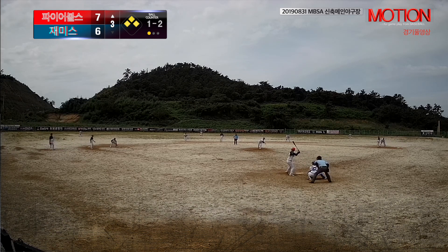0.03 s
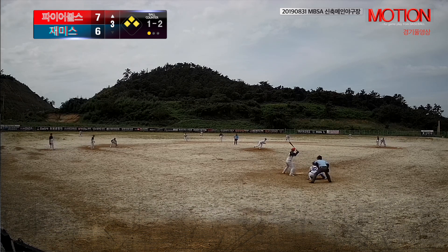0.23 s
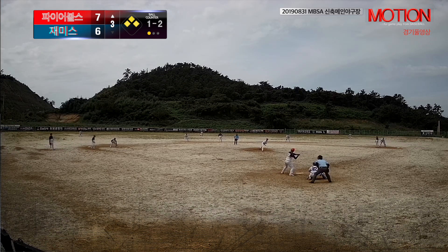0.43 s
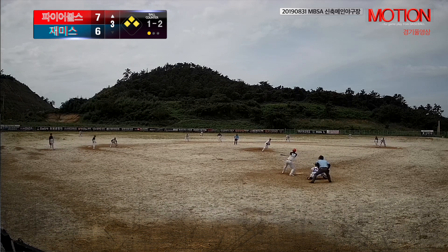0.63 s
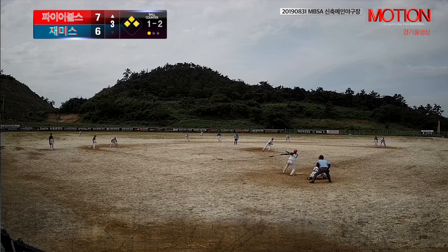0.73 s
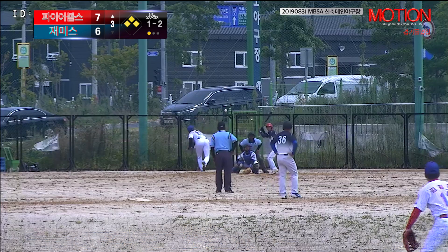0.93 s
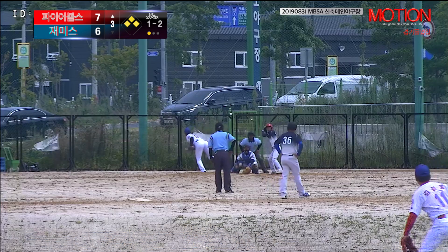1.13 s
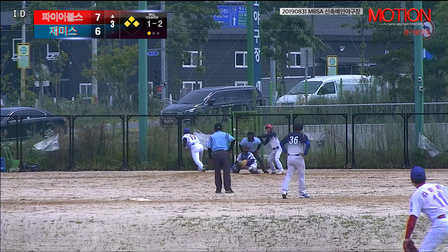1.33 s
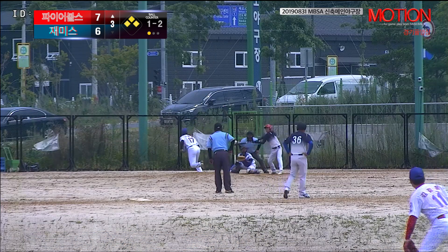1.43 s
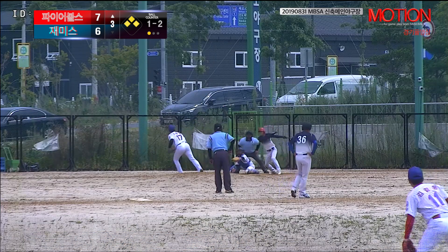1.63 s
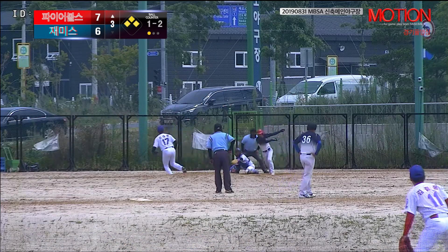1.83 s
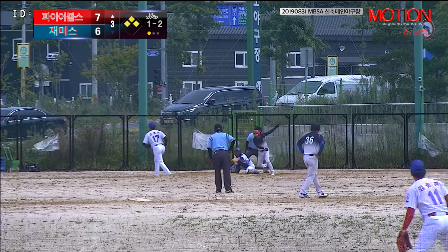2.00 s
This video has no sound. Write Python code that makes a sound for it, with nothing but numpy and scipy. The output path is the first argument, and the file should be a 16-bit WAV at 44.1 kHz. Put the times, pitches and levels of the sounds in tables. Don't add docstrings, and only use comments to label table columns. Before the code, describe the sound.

Over low far-off traffic and light gritty scuffs, a loud glove pop cracks and echoes off fences outdoors, then the same stretch plays again with an identical pop, through a narrow, overloading, low-quality mono camera microphone.

```python
import sys
import numpy as np
from scipy import signal
from scipy.fft import rfft, irfft
from scipy.io import wavfile
from scipy.ndimage import uniform_filter1d

SR = 44100
rng = np.random.default_rng(int(sys.argv[2]) if len(sys.argv) > 2 else 0)


def wrap_up_sound(samples):
    columns = np.atleast_2d(samples).T
    tamed = np.clip(columns, -1, 1)
    steps = np.round(tamed * 32767).astype(np.int16)
    wavfile.write(sys.argv[1], SR, steps)


def linear_from_db(decibels):
    return 10 ** (np.asarray(decibels, float) / 20)


N = 91022
LEAD_S = 0.06

# (frequency [Hz], density [dB per Hz])
TRAFFIC_SPECTRUM = [(25, -35), (70, -16.5), (400, -10.5), (760, -2.5), (1030, -0.5), (1190, -10),
                    (2500, -19), (3900, -23.5)]
# (time [s], level [dB])
TRAFFIC_SWELL = [(0, -0.5), (.15, -0.5), (.3, 1), (.45, -0.5), (.6, 1.5), (.75, 1.5), (.9, 2), (1.06, 0.5)]
# (time [s], level [dB], length [s], bright share [dB])
SCUFF_EVENTS = [(0.01, -33.5, 0.0084, -16), (0.38, -28.5, 0.013, -20), (0.4586, -22.5, 0.0013, -10),
                (.463, -30.5, 0.0094, -12), (0.471, -30.5, 0.023, -8.5), (0.5877, -33.5, .003, 10),
                (0.597, -31, 0.0094, 2.5), (0.607, -41.5, 0.01, -1.5), (.634, -43.5, 0.0014, 15.5),
                (0.686, -29, 0.0088, -4), (0.705, -24, 0.0011, -5), (1.0, -34.5, .01, 0.5),
                (1.05, -25.5, .015, -8.5)]
# (frequency [Hz], level [dB], T60 [s])
GRIT_MODES = [(1293, 3, .015), (1475, -1, 0.017), (1925, 2.5, 0.0094), (2280, -12, 0.013)]
# (frequency [Hz], level [dB], T60 [s])
DULL_MODES = [(327, -47.5, 0.014), (674, -9.5, 0.029), (825, 5, 0.032), (973.4, 2.5, 0.09)]
# (time [s], level [dB], contact [ms])
BALL_BLOWS = [
    (.7775, 0.5, 0.38),
    (.7807, -10.5, 0.19),
    (.7862, -7, 0.78),
    (.7894, -17, 0.27),
    (.7925, -11.5, 0.12),
]
# (time [s], level [dB])
LEATHER_SNAPS = [
    (.7806, 0),
    (.78385, -7),
    (.7871, -20),
]
# (frequency [Hz], level [dB], T60 [s])
POCKET_MODES = [(798, 3, 0.0086), (318, -12, 0.026), (653.7, -5.5, 0.055), (901, -11, 0.078),
                (975, -12.5, 0.041), (1396, -14, 0.026)]
# (frequency [Hz], level [dB], T60 [s])
CRACK_MODES = [(1835, -11, 0.015), (2145, -1.5, 0.0076), (2630, -9, 0.0071), (3510, -10, 0.0062)]
# (time [s], level [dB], spread [s], bright share [dB])
FENCE_ECHOES = [
    (0.813, -19.5, 0.0082, -16),
    (0.829, -14, .004, -19),
    (.837, -18.5, 0.0052, -13.5),
    (.842, -31, 0.0058, -5.5),
    (.855, -19, .006, -25),
    (0.865, -19.5, 0.0095, -35),
    (0.883, -35, 0.0054, -19),
    (.892, -20.5, 0.0043, -16),
    (0.911, -29, 0.0092, -25),
]
# (frequency [Hz], level [dB], T60 [s])
SLAP_MODES = [(1530, 0, 0.0068), (2770, -1, 0.0024), (3680, -4, 0.0047)]


def wander(rate_hz):
    hold = int(SR / rate_hz)
    steps = np.repeat(rng.standard_normal(N // hold + 1), hold)
    smooth = uniform_filter1d(uniform_filter1d(steps, hold), hold)
    return 0.93 * smooth[:N]


def traffic(t):
    level_db, flicker_db = -36.5, -1
    freq_hz = np.fft.rfftfreq(N, 1 / SR) + 1
    table_hz, table_db = np.array(TRAFFIC_SPECTRUM).T
    colour = linear_from_db(np.interp(np.log(freq_hz), np.log(table_hz), table_db))
    shared_drift = wander(12.7)
    hum = 0
    for k in range(21):
        share = np.sqrt(np.clip(1 - np.abs(3 * np.log2(freq_hz / 40) - k), 0, 1))
        band = irfft(rfft(rng.standard_normal(N)) * colour * share, N)
        hum = hum + linear_from_db(flicker_db * wander(22.05)) * band
    swell_db = np.interp(t, *np.array(TRAFFIC_SWELL).T) + 2.37 * shared_drift
    return hum / hum.std() * linear_from_db(level_db + swell_db)


def ring(strike, modes):
    out = 0
    for hz, db, t60_s in modes:
        decay = np.log(1000) / (max(t60_s, 0.003) * SR)
        pole = np.exp(2j * np.pi * hz / SR - decay)
        out = out + linear_from_db(db) * signal.lfilter([1], [1, -pole], strike).imag
    return out


def modal_noise(modes, top_hz):
    band = signal.butter(3, [280, top_hz], "band", fs=SR, output="sos")
    noise = signal.sosfilt(band, ring(rng.standard_normal(N), modes))
    noise = noise / np.sqrt(uniform_filter1d(noise ** 2, size=260))
    return noise / noise.std()


def swells(t, events, dull, bright):
    out = 0
    for start_s, db, length_s, bright_db in events:
        u = np.clip((t - start_s) / length_s, 0, 30)
        envelope = np.e * u * np.exp(-u * 1.854)
        out = out + linear_from_db(db) * envelope * (dull + linear_from_db(bright_db) * bright)
    return out


def scuffs(t):
    return swells(t, SCUFF_EVENTS, modal_noise(DULL_MODES, 1020), modal_noise(GRIT_MODES, 2530))


def catch(t):
    pushes, snaps = np.zeros(N), np.zeros(N)
    for start_s, db, contact_ms in BALL_BLOWS:
        u = (t - start_s) * 1000 / contact_ms
        push = (1 - 2 * u ** 2) * np.exp(-u ** 2)
        pushes += linear_from_db(db) * push * 1000 / (contact_ms * SR)
    for start_s, db in LEATHER_SNAPS:
        snaps[int((start_s + LEAD_S) * SR)] += linear_from_db(db)
    return ring(pushes, POCKET_MODES) + ring(snaps, CRACK_MODES)


def echoes(t):
    wash_db, wash_t60_s, wash_rise_s, wash_bright_db = -20.5, 0.39, 0.029, -17
    slaps = swells(t, FENCE_ECHOES, modal_noise(DULL_MODES, 980), modal_noise(SLAP_MODES, 5100))
    since_s = np.clip(t - BALL_BLOWS[0][0], 0, None)
    envelope = linear_from_db(wash_db - 60 * since_s / wash_t60_s) * (1 - np.exp(-since_s / wash_rise_s))
    wash = modal_noise(DULL_MODES, 1090) + linear_from_db(wash_bright_db) * modal_noise(GRIT_MODES, 4200)
    return slaps + envelope * wash


def scene():
    t = np.arange(N) / SR - LEAD_S
    return (traffic(t) + scuffs(t) + catch(t) + echoes(t))[None]


def band_limit(x):
    return signal.sosfilt(signal.butter(12, 15680, fs=SR, output="sos"), x)


def record(dry):
    camera_hz, clip, offset = 8000, 1.0, 0.002
    jump_s, back_s = 0.947, 1
    dip_start_s, dip_end_s, pop_s, dip_hz = 0.761, 0.774, 0.776, 3800
    t = np.arange(N) / SR

    lowpass = signal.butter(4, 3900, fs=SR, output="sos")
    mic = signal.sosfilt(lowpass, dry[0]) + offset
    ticks_s = np.arange(0, N / SR, 1 / camera_hz)
    samples = np.clip(np.interp(ticks_s, t, mic), -clip, clip)

    source_s = t - back_s * (t >= jump_s)
    played = np.interp(source_s + LEAD_S, ticks_s, samples)

    in_dip = (source_s > dip_start_s) & (source_s < dip_end_s)
    dip = uniform_filter1d(in_dip.astype(float), size=130)
    before_pop = played * (source_s < pop_s)
    highpass = signal.butter(6, dip_hz, "high", fs=SR, output="sos")
    played = played - dip * signal.sosfiltfilt(highpass, before_pop)
    return band_limit(played[None])


dry = scene()
out = record(dry)
wrap_up_sound(out)
```